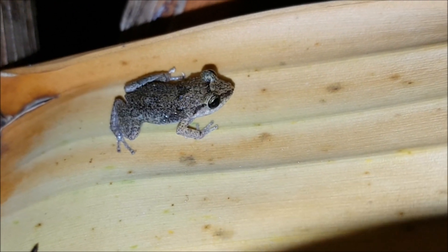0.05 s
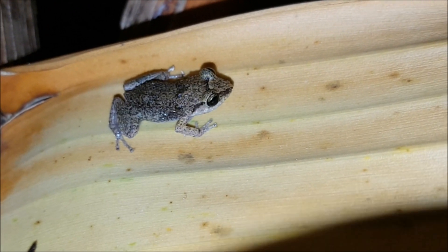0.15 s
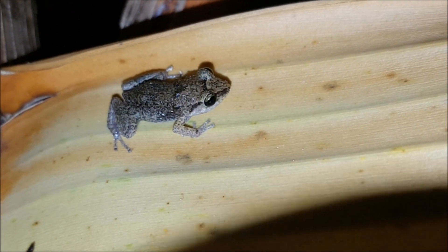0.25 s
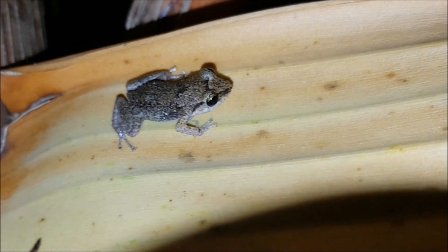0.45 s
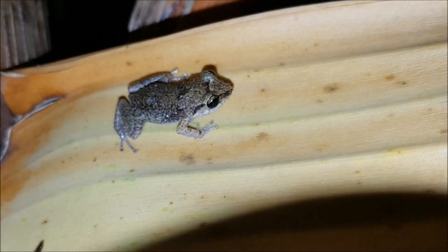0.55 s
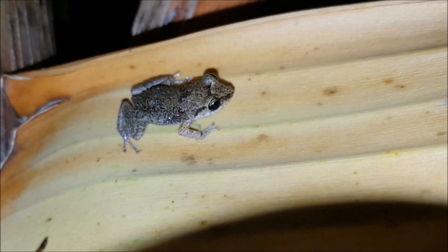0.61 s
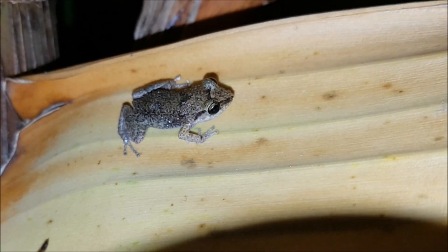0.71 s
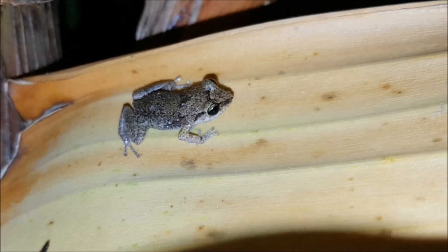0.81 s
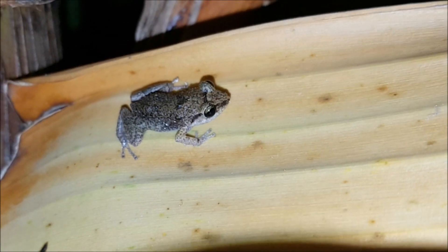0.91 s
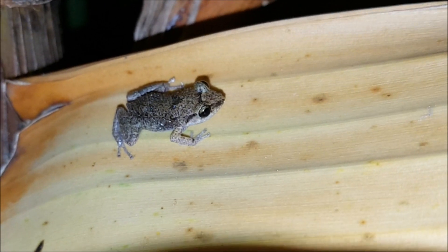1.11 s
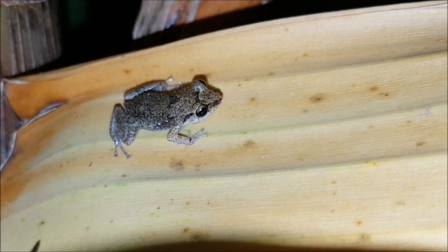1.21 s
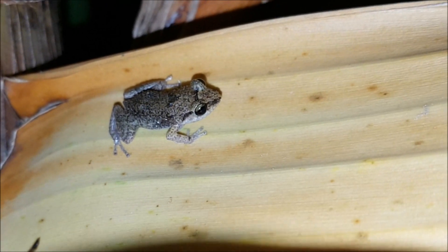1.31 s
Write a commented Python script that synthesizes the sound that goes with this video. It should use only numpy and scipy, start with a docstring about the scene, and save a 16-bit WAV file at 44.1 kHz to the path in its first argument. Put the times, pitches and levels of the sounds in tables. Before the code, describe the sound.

A tree frog whistles close by at about 0.2 seconds: a short, lower note, then a loud, high one that slides up and ends near 0.45 seconds. From 0.6 to 0.9 seconds a distant frog on the right answers with a faint, slightly lower two-note call. Both echo lightly in the night air. Soft rumble, hiss, a low machine hum and very faint insects run throughout.

```python
"""A tree frog, close up on a leaf at night, gives one two-note whistle: a short low note, then a loud
high one that rattles in as the voice breaks and slides up, filtered by the vocal sac.
A second frog answers from farther off, and leaves, walls and garden echo both.
Underneath sit rumble and hiss, a low machine hum, a thin band of insects and faint foliage ticks."""
import sys
import numpy as np
from scipy import signal
from scipy.fft import rfft, irfft
from scipy.io import wavfile

SR = 44100
rng = np.random.default_rng(int(sys.argv[2]) if len(sys.argv) > 2 else 0)


def inscribe(sig):
    """Save sig as 16-bit PCM at rate SR to the path in sys.argv[1].

    A 1-D sig is mono; a 2-D sig holds one channel per row.
    Samples are clipped to [-1, 1] before scaling.
    """
    pcm = np.round(np.clip(np.atleast_2d(sig).T, -1, 1) * 32767)
    wavfile.write(sys.argv[1], SR, pcm.astype(np.int16))


N = 59535
T = np.arange(N) / SR
FREQS = np.maximum(np.arange(N // 2 + 1) * SR / N, 1)


def amp(db):
    """Decibels to gain."""
    return 10 ** (np.asarray(db) / 20)


def unit(x):
    """Scale to rms 1."""
    return x / np.sqrt(np.mean(x ** 2))


def noise(gain):
    """Noise of rms 1, shaped by a gain at each frequency."""
    return unit(irfft(rfft(rng.standard_normal(N)) * gain, N))


def passband(hz, width_hz, order):
    """Gain curve of a flat-topped resonance."""
    return 1 / np.sqrt(1 + np.abs((FREQS - hz) / width_hz * 2) ** (2 * order))


def band(hz, width_hz):
    """A band of noise, unrelated left and right."""
    return np.array([noise(passband(hz, width_hz, order=3)) for _ in range(2)])


def wander(rate_hz):
    """Smooth random modulation of rms 1."""
    return noise(np.exp(-(FREQS / rate_hz) ** 2))


def on_spectrum(points):
    """Join (frequency, value) points on a log-frequency axis."""
    hz, value = np.array(points).T
    return np.interp(np.log(FREQS), np.log(hz), value)


def gate(start, end, attack_s, release_s):
    """Linear attack, hold, exponential release."""
    return np.clip((T - start) / attack_s, 0, 1) * np.exp(-np.maximum(T - end, 0) / release_s)


def place(tone, pan_db, lead_rad):
    """Put a complex tone in stereo: left is louder by pan_db and ahead by lead_rad."""
    left = amp(pan_db / 2) * np.exp(.5j * lead_rad)
    right = amp(-pan_db / 2) * np.exp(-.5j * lead_rad)
    return np.imag([tone * left, tone * right]) * 2 * np.sqrt(2) / np.abs(left + right)


def phase_of(hz):
    """Running phase of a pitch curve."""
    return 2 * np.pi * np.cumsum(hz) / SR


def night_air():
    """A steady bed: centred rumble under wide, faint hiss."""
    # (frequency [Hz], relative noise density [dB])
    spectrum = [(20, -27), (45, 1), (75, -9), (110, -5), (170, -3.5), (230, -14), (320, -16), (540, -14),
                (800, -22.5), (1050, -29.5), (1800, -33), (3000, -39.5), (5000, -46.5), (6500, -47),
                (9500, -53.5), (15000, -48)]
    # (frequency [Hz], left-right correlation [ratio])
    correlation = [(50, .98), (170, .93), (350, .66), (700, .12), (1400, -.3), (3000, 0), (12000, 0)]
    gain = amp(on_spectrum(spectrum))
    alike = np.clip(on_spectrum(correlation), -.9, .995)
    side_gain = gain * np.sqrt((1 - alike) / (1 + alike))
    side = noise(side_gain) * np.sqrt(np.sum(side_gain ** 2) / np.sum(gain ** 2))
    return amp(-46.3) * (noise(gain) + side * np.array([[1], [-1]]))


def machine_hum():
    """A machine drones in low sine tones, each wavering slightly in pitch."""
    # hum tones (pitch [Hz], level [dB])
    tones = [(59, -55), (99.6, -55), (120, -55.5), (165, -57), (348, -61), (492, -67), (714, -71),
             (828, -71)]
    return sum(amp(db) * np.sqrt(2) * np.sin(phase_of(hz + 1.2 * wander(5)) + rng.uniform(0, 2 * np.pi))
               for hz, db in tones)


def insects():
    """Far insects blur into a thin, flickering band, a little to the left."""
    chorus = band(7140, width_hz=480) * amp(-72.3 + 2.3 * wander(40))
    return chorus * amp([[1], [-1]])


def foliage_ticks():
    """Soft ticks in the leaves, each a tiny burst of band noise."""
    # (time [s], centre [Hz], width [Hz], decay [s], level [dB])
    ticks = [(.081, 1570, 200, .009, -53), (.047, 5000, 1800, .012, -66), (.085, 5000, 5000, .01, -66),
             (.977, 10000, 6000, .004, -71)]
    return sum(amp(db) * gate(start, start + .003, .003, decay) * band(hz, width)
               for start, hz, width, decay, db in ticks)


def low_note(note, overtones=(), flare_gain=0):
    """A short, raspy whistle that snaps in and lifts at the end; its octave can flare at both ends."""
    start, length, hz, db, pan_db, lead_rad = note
    end = start + length
    lift_hz, lift_s, flare_s = 55, .006, .005
    lift = lift_hz * np.exp(-np.abs(T - end) / lift_s)
    phase = phase_of((hz + lift) * (1 + .0015 * wander(300)))
    envelope = gate(start, end, attack_s=.007, release_s=.006)
    whistle = place(envelope * np.exp(1j * phase), pan_db, lead_rad)
    flare = gate(start, start, .0006, flare_s) + envelope * np.exp(-np.abs(T - end + .003) / flare_s)
    upper = envelope * sum(amp(level) * np.exp(1j * k * phase) for k, level in overtones)
    octave = flare_gain * flare * (1 + .4 * wander(500)) * np.exp(2j * phase)
    snap = amp(-20.5) * gate(start, start, attack_s=.0005, release_s=.003)
    rasp = (amp(-33) * envelope + snap) * band(3200, width_hz=2100)
    return amp(db) * (whistle + place(upper + octave, pan_db=-1.5, lead_rad=.8) + rasp)


def high_note(note, effort, overtones=()):
    """A whistle through the vocal sac: it rattles in, scoops up, levels off and sags as it ends."""
    start, end, top_hz, rise_hz = note
    times, *curves = np.array(effort).T
    db, pan_db, lead_rad = (np.interp(T, times, curve) for curve in curves)
    age = np.maximum(T - start, 0)
    scoop_hz, scoop_s, rise_s = 760, .006, .044
    sag_hz, sag_s = 48, .011
    hz = top_hz - scoop_hz * np.exp(-age / scoop_s) - rise_hz * np.exp(-age / rise_s)
    hz -= sag_hz * np.exp(np.minimum((T - end) / sag_s, 1))
    phase = phase_of(hz * (1 + .0005 * wander(150)))
    rattle_hz, rattle_s = 400, .012  # the voice breaks between the notes
    rattle_depth = .65 * np.exp(-(age / rattle_s) ** 2)
    rattle = rattle_depth * np.cos(phase_of(rattle_hz * (1 + .3 * wander(250))))
    envelope = gate(start, end, attack_s=.002, release_s=.0055) * (1 + rattle)
    whistle = place(amp(db) * envelope * np.exp(1j * phase), pan_db, lead_rad)
    vocal_sac = passband(3600, width_hz=1300, order=6)
    whistle = irfft(rfft(whistle) * vocal_sac, N)
    # Overtones fade in as the rattle settles and swell less than the whistle.
    fade_in = np.minimum(age / .014, 1) ** 2
    pivot_db, growth = -15, .45
    brightness = amp(pivot_db + growth * (db - pivot_db)) * envelope * fade_in
    upper = brightness * sum(amp(level) * np.exp(1j * k * phase) for k, level in overtones)
    return whistle + place(upper, pan_db=3, lead_rad=1.3)


def near_frog():
    """The close call: two whistled notes, bright with overtones."""
    # (start [s], length [s], pitch [Hz], level [dB], pan left [dB], left lead [rad])
    low = (.2195, .047, 2136, -27.2, 1, 2.26)
    # (harmonic [number], relative level [dB])
    low_overtones = [(2, -32), (3, -33.5), (4, -53), (5, -50), (6, -58), (7, -54)]
    # (start [s], end [s], top pitch [Hz], slow rise [Hz])
    high = (.2665, .4505, 3914, 205)
    # high note's swell (time [s], level before the sac [dB], pan left [dB], left lead [rad])
    effort = [(.267, -34, 0, .6), (.28, -22, -2, -.1), (.284, -24.5, -7, -.6), (.298, -21.5, -19, .3),
              (.31, -22.5, -7, 1.5), (.322, -20.3, -1, 1.3), (.336, -15.8, 3, .6), (.355, -15.7, 1, -.4),
              (.38, -14.3, -3, -.4), (.412, -14.8, -4, -.5), (.443, -17.3, 1, -.4), (.451, -22, 6, .5)]
    # (harmonic [number], relative level [dB])
    high_overtones = [(2, -58), (3, -63.5), (4, -50)]
    return low_note(low, low_overtones, flare_gain=amp(-14)) + high_note(high, effort, high_overtones)


def far_frog():
    """The answer from the right: lower, faint and without overtones."""
    # (start [s], length [s], pitch [Hz], level [dB], pan left [dB], left lead [rad])
    low = (.592, .06, 1938, -58.5, -3.5, -2.4)
    # (start [s], end [s], top pitch [Hz], slow rise [Hz])
    high = (.645, .868, 3526, 220)
    # high note's swell (time [s], level before the sac [dB], pan left [dB], left lead [rad])
    effort = [(.646, -59, 0, 0), (.665, -58, 0, 0), (.682, -45, -3, .3), (.702, -45, -4, .3),
              (.713, -57, -5, .6), (.737, -48, 0, .6), (.77, -47.5, -10, .6), (.8, -43.5, -9, .6),
              (.852, -46, -6, .6), (.866, -53, -6, .6)]
    return low_note(low) + high_note(high, effort)


def reflections(near, far, surface):
    """A decaying cloud of reflections of both frogs, different on each side."""
    delay, t60, near_db, far_db = surface
    tail = rng.standard_normal((2, N)) * (T > delay) * np.exp(-np.log(1000) * T / t60)
    send = amp(near_db) * near + amp(far_db) * far
    return signal.fftconvolve(send, unit(tail) / np.sqrt(N), axes=1)[:, :N]


def echoes(near, far):
    """Leaves throw the calls back first; walls and garden follow, darker and fluttering."""
    # reflectors (pre-delay [s], 60 dB decay [s], near frog send [dB], far frog send [dB])
    leaves = (.008, .085, -17.5, -14)
    walls = (.028, .18, -31, -15)
    garden = (.05, 1.05, -48, -19)
    # tone of the late echoes (frequency [Hz], gain [dB])
    late_eq = [(2100, 7), (3300, 7), (3900, -1), (8000, -2)]
    colour = amp(on_spectrum(late_eq))
    darkened = [irfft(rfft(frog) * colour, N) for frog in (near, far)]
    late = reflections(*darkened, walls) + reflections(*darkened, garden)
    flutter = amp(3 * wander(rate_hz=55))
    return reflections(near, far, leaves) + late * flutter


def scene():
    """Call, answer and echoes over the night ambience."""
    near, far = near_frog(), far_frog()
    return near + far + echoes(near, far) + night_air() + machine_hum() + insects() + foliage_ticks()


def record(dry):
    """A steep low-pass trims the highest treble."""
    cutoff_hz = 15700
    return signal.sosfilt(signal.ellip(10, .1, 80, cutoff_hz, fs=SR, output="sos"), dry)


dry = scene()
out = record(dry)
inscribe(out)
```